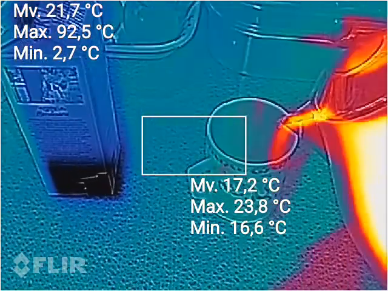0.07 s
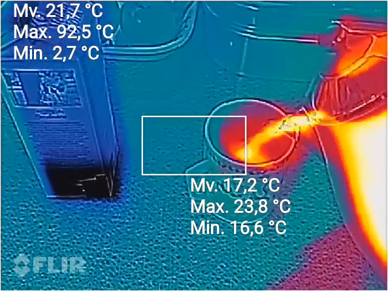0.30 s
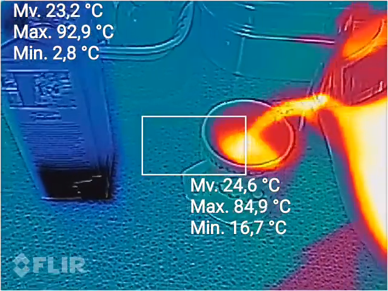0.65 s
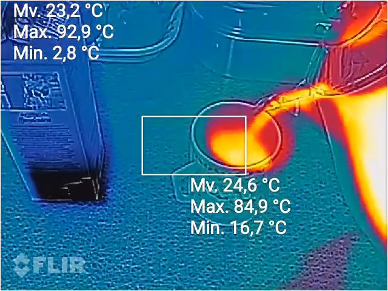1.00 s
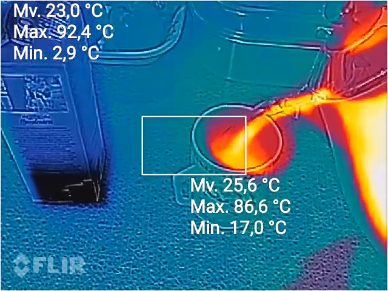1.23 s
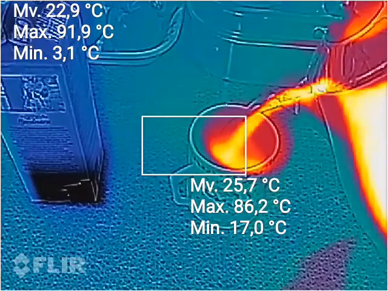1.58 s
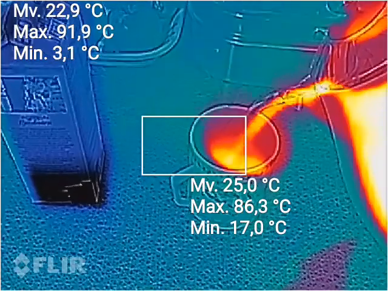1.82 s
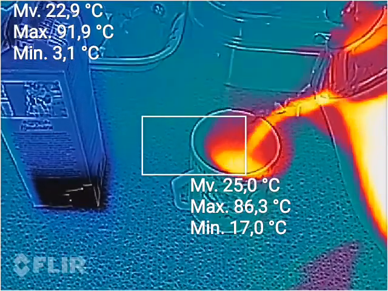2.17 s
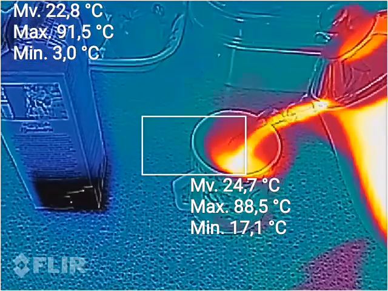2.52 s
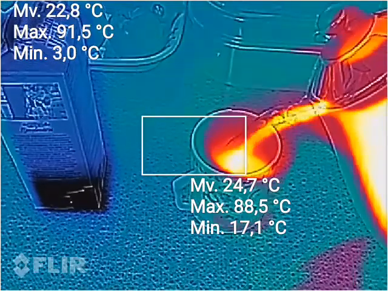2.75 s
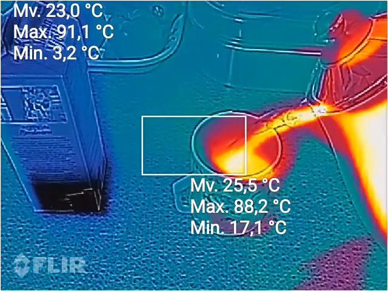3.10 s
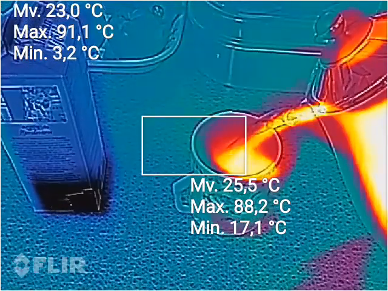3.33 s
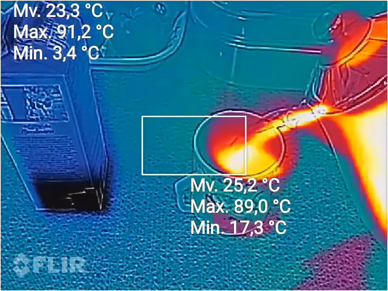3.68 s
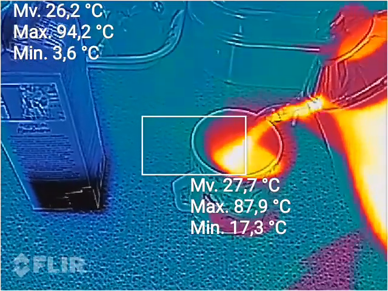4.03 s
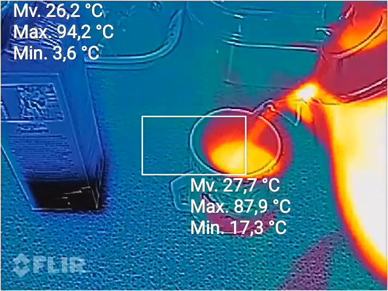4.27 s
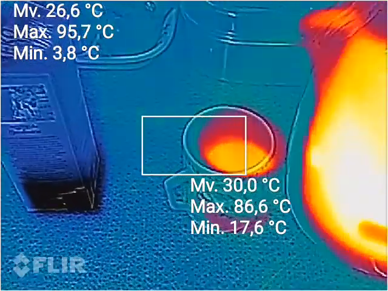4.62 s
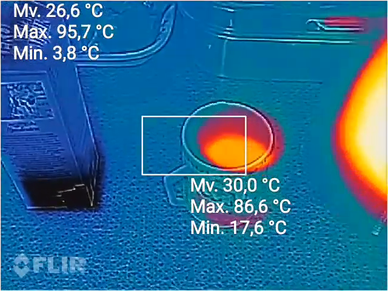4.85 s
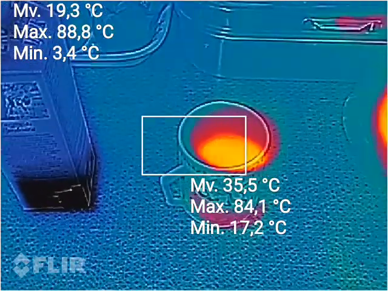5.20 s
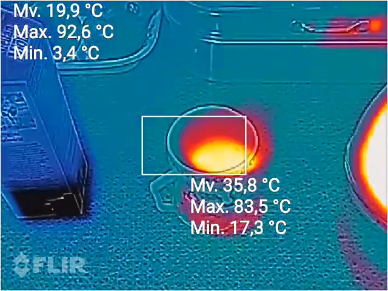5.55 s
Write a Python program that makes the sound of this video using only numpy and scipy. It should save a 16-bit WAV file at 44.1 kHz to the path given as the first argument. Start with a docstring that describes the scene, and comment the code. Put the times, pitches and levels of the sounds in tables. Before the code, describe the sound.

Hot water runs from a kettle into a mug close to the microphone. It starts with a bright, fizzy spatter, then turns to rounder gurgling as the mug fills. After about four seconds the pour ends in a few small glugs and a faint swish inside the kettle. The kettle is then set down with a sudden loud thump and clack, and nudged into place. The kitchen is otherwise quiet, with a short echo.

```python
"""Hot water runs from a kettle into a mug on a kitchen counter, over faint hiss and rumble.
First the stream spatters on the bottom; as the pool deepens it drags ever larger bubbles under,
which ring in the mug. Just after 4 s it ends in a few drops, the spout glugs and the water
swishes in the kettle. At 5.2 s the kettle is set down hard, booming the counter and clacking
into the room; it rocks onto its base and is nudged into place."""
import sys
import numpy as np
from scipy import signal
from scipy.fft import rfft, irfft, next_fast_len
from scipy.io import wavfile
from scipy.ndimage import uniform_filter1d, map_coordinates

SR = 44100
rng = np.random.default_rng(int(sys.argv[2]) if len(sys.argv) > 2 else 0)


def log_audio(samples):
    """Write samples as a 16-bit WAV file to the path given in sys.argv[1]."""
    # one column per channel
    frames = np.atleast_2d(samples).T
    # limit to full scale, then quantise
    limited = np.clip(frames, -1, 1)
    pcm = np.round(limited * 32767).astype(np.int16)
    wavfile.write(sys.argv[1], SR, pcm)


N = 249106
TIME = np.arange(N) / SR
POUR_START_S, POUR_END_S = 0.052, 4.268
BURSTS_PER_S = 20   # pace of the ragged swings in fizz, spray and the mug's ring


def from_db(db):
    """Decibels to gain."""
    return 10 ** (np.asarray(db) / 20)


def rms_one(x):
    """Scale to rms 1."""
    return x / np.sqrt(np.mean(x ** 2) + 1e-20)


def peak_at(db, x):
    """Scale to a peak level."""
    return from_db(db) * x / np.abs(x).max()


def steadied(x):
    """Ride the running level to about 1 while the grains keep their contrast."""
    power = uniform_filter1d(uniform_filter1d(x ** 2, 6000), 3000)
    return x / np.sqrt(np.maximum(power, 0) + np.mean(x ** 2) / 100)


def automation(points):
    """One value per sample from (seconds, value) breakpoints."""
    return np.interp(TIME, *np.transpose(points))


def ramp(centre_s, length_s):
    """A straight rise from 0 to 1 around a moment."""
    return np.clip((TIME - centre_s) / length_s + .5, 0, 1)


def fade(t60, size):
    """Exponential decay from 1, down 60 dB after t60 seconds."""
    return np.exp(-np.log(1000) * TIME[:size] / t60)


def drift(per_s):
    """A smooth wander through per_s random values a second; rms 1."""
    knots = rng.standard_normal(1000)
    return rms_one(map_coordinates(knots, [TIME * per_s], order=3, mode="wrap"))


def add(out, s, sound):
    """Mix a sound in at s seconds."""
    i = int(np.clip(round(s * SR), 0, N - 1))
    out[i:i + len(sound)] += sound[:N - i]


def cut(x, hz, kind, order=2):
    """Butterworth low- or high-pass."""
    return signal.sosfilt(signal.butter(order, min(hz, .45 * SR), kind, fs=SR, output="sos"), x + 1e-18)


def resonate(x, modes):
    """Parallel resonances, each with its own width and gain."""
    out = 0
    for hz, width_hz, db in modes:
        r = np.exp(-np.pi * width_hz / SR)
        poles = [1, -2 * r * np.cos(2 * np.pi * hz / SR), r * r]
        zeros = [(1 - r * r) / 2, 0, -(1 - r * r) / 2]
        out = out + from_db(db) * signal.lfilter(zeros, poles, x + 1e-18)
    return out


def noise(colour, size=N):
    """Noise shaped by (Hz, dB) points, falling steeply past both ends; rms 1."""
    padded = next_fast_len(size)
    hz = np.maximum(np.fft.rfftfreq(padded, 1 / SR), 1)
    points_hz, points_db = np.transpose(colour)
    eq = from_db(np.interp(np.log(hz), np.log(points_hz), points_db))
    skirts = 1 / np.sqrt((1 + (points_hz[0] / hz) ** 6) * (1 + (hz / points_hz[-1]) ** 6))
    white = rfft(rng.standard_normal(padded))
    return rms_one(irfft(white * eq * skirts, padded)[:size])


def patter(colour, per_s, spread_db, decay_s):
    """Tiny impacts of random strength, each a very short burst of noise."""
    hits = (rng.random(N) < per_s / SR) * from_db(spread_db * np.minimum(rng.exponential(1, N), 4))
    power = signal.fftconvolve(hits ** 2, fade(decay_s, size=600))[:N]
    return np.sqrt(np.maximum(power, 0)) * noise(colour)


# The quiet room's hiss and its low rumble. Each row: frequency in Hz, relative level in dB.
HISS_COLOUR = [(200, -3), (500, -7.5), (1200, -10), (2500, -17.5), (8000, -19.5), (16000, -9)]
RUMBLE_COLOUR = [(15, -58), (25, -12), (54, 5), (103, -3), (134, 1.5), (165, 0), (200, -5), (400, -11),
                 (520, -16), (880, -58)]
# The fader ride on the rumble. Each row: time in seconds, level in dB.
RUMBLE_RIDE = [(.05, -68), (.35, -71.5), (.5, -73.5), (2.5, -73), (2.8, -71), (4.1, -72.5), (4.5, -70),
               (4.62, -73), (4.7, -80), (5.12, -78.5)]


def room_tone():
    """Faint hiss, and a rumble that swells as the kettle is swung and sinks after the pour."""
    hiss = from_db(-82.5) * noise(HISS_COLOUR)
    rumble = from_db(automation(RUMBLE_RIDE)) * noise(RUMBLE_COLOUR)
    return hiss + rumble


# The length of the kitchen's tail. Each row: frequency in Hz, t60 in seconds.
REVERB_DECAY = [(150, .32), (500, .37), (2000, .37), (5000, .35), (9000, .29), (15000, .22)]
# The tone of that tail. Each row: frequency in Hz, relative level in dB.
REVERB_COLOUR = [(120, 25.5), (260, 9), (400, 4.5), (620, 3), (1500, -3), (4500, 0), (8000, -2), (15000, 4)]


def kitchen_reverb(x, first_echo_s=0.0034, size=26000):
    """Diffuse reflections build up after the first echo and die sooner in the treble."""
    wash = rfft(noise(REVERB_COLOUR, size))
    log_hz = np.log(np.maximum(np.fft.rfftfreq(size, 1 / SR), 1))
    centres_hz, t60s = np.transpose(REVERB_DECAY)
    tail = np.zeros(size)
    for share, t60 in zip(np.eye(len(t60s)), t60s):
        band = np.interp(log_hz, np.log(centres_hz), share)
        tail += irfft(wash * band, size) * fade(t60, size)
    tail *= np.clip(TIME[:size] / first_echo_s - 1, 0, 1)
    return signal.fftconvolve(x, tail / np.sqrt(np.sum(tail ** 2)))[:N]


# Early reflections. Each row: delay in seconds, level in dB against the direct sound.
EARLY_ECHOES = [(.007, -14.5), (0.0153, -17)]


def near_walls(x):
    """The sound plus its first bounces off the back wall and cupboards."""
    out = x.copy()
    for delay_s, db in EARLY_ECHOES:
        add(out, delay_s, from_db(db) * x)
    return out


def slapback(x, delay_s=0.0065):
    """The sound plus its treble coming straight back off the wall."""
    out = x.copy()
    add(out, delay_s, from_db(-1.5) * cut(x, 8800, "high"))
    return out


# Water sloshing inside the kettle. Each row: frequency in Hz, relative level in dB.
SWISH_COLOUR = [(120, -34), (200, -31), (512, -7), (1150, -16), (1260, -8), (1460, -22), (1540, -16),
                (2550, -12.5), (3410, -21.5), (15000, -20.5)]


def kettle_swish(start_s=4.425, attack_s=0.025, hold_s=0.035, t60=0.53):
    """The kettle is tipped upright; its water swishes and settles."""
    attack = np.clip((TIME - start_s) / attack_s, 0, 1)
    settling_s = np.maximum(TIME - start_s - attack_s - hold_s, 0)
    return attack * from_db(-69 - 60 * settling_s / t60) * noise(SWISH_COLOUR)


# The hard tone of kettle on base, for scuff and clacks. Each row: frequency in Hz, relative level in dB.
CONTACT_COLOUR = [(250, -14), (360, 0.5), (464, -7.5), (700, -13), (963, -8.5), (1240, -10.5),
                  (2060, -11.5), (2270, -18.5), (2700, -13.5), (3150, -18), (4500, -13.5), (6000, -14),
                  (7120, -24.5), (9630, -18), (12600, -19.5), (16000, -27)]


def kettle_scuff():
    """The kettle's foot rubs over the base with a faint gritty rustle."""
    grit = rms_one(patter(CONTACT_COLOUR, per_s=580, spread_db=3.5, decay_s=0.016))
    return from_db(-68) * ramp(centre_s=5.51, length_s=0.03) * grit


def struck(modes, size):
    """A knocked object: each mode takes about a cycle to build up, then rings out."""
    return sum(from_db(db) * np.sin(2 * np.pi * hz * TIME[:size])
               * fade(t60, size) * (1 - fade(4 / hz, size)) for hz, db, t60 in modes)


# The boom of the flexing counter top and the ring of the kettle's body.
# Each row: frequency in Hz, relative level in dB, t60 in seconds.
COUNTER_MODES = [(64, -15, .42), (89, -2, .3), (102, 1, .26), (115, -5, .264), (138, -10, .42),
                 (187, -21, .42), (216, -16, .42)]
KETTLE_MODES = [(333, -16, 0.23), (391, -15.5, .34), (444, -4, 0.071), (447, -25, 0.19), (548, -22.5, .36),
                (636, -32, 0.42), (915, -20, 0.23), (977, -6.5, 0.067), (1180, -34, .15), (1500, -16, 0.13),
                (2104, -27.5, 0.19), (2745, -19.5, 0.1), (3950, -14, 0.066), (6240, -16, 0.059)]
# The kettle lands, rocks and is nudged home. Each row: start in seconds, thump gain in dB,
# clack gain in dB, brightness as a low-pass cutoff in Hz, clack t60 in seconds.
KETTLE_KNOCKS = [(5.1841, -11, -16.5, 11100, 0.06), (5.26, -12.5, -14.5, 10200, 0.041),
                 (5.2856, -20.5, -23, 13800, 0.024), (5.517, -39.5, -50.5, 1200, 0.19),
                 (5.609, -38, -45, 1840, 0.11), (5.639, -30, -40.5, 2370, 0.033)]


def kettle_down(size=SR // 2):
    """Each contact thumps the counter, rings the kettle and sets off a short, noisy clack."""
    thumps, rings, clacks = np.zeros((3, N))
    counter, body = struck(COUNTER_MODES, size), struck(KETTLE_MODES, size)
    attack = 1 - fade(0.005, size)
    crack = from_db(-3.5) * fade(0.027, size)   # the sharp front of each clack
    for s, thump_db, clack_db, bright_hz, clack_t60 in KETTLE_KNOCKS:
        clack = noise(CONTACT_COLOUR, size) * attack * (crack + fade(clack_t60, size))
        add(thumps, s, from_db(thump_db) * counter)
        add(rings, s, from_db(thump_db - 2) * cut(body, bright_hz, "low", order=1))
        add(clacks, s, from_db(clack_db) * cut(clack, bright_hz, "low"))
    return thumps, rings, clacks


# The mug's air column and wall. Each row: frequency in Hz, width in Hz, gain in dB.
MUG_MODES = [(372.7, 30.4, 10.5), (504, 32, 7), (593.4, 69, 4.5), (861, 115, 3), (985, 43, 1),
             (1596, 38, 4.5), (1900, 24, 1), (2390, 18, 4), (2998, 28, 4), (3150, 29, 8.5), (3820, 29, 1),
             (5420, 240, 0)]


def mug(x):
    """The mug's resonances ring on top of the direct sound."""
    return x + resonate(x, MUG_MODES)


def fill(s):
    """How full the mug is at s seconds, 0 to 1."""
    return np.clip((s - POUR_START_S) / (POUR_END_S - POUR_START_S), 0, 1)


def shallow():
    """1 while the jet still hits the bottom, 0 once the pool is deep enough to swallow air."""
    return 1 - ramp(centre_s=1.675, length_s=0.47)


# The hollow notes of the air in the mug. Each row: frequency in Hz, width in Hz, gain in dB.
AIR_MODES = [(570, 47, -12), (853, 117, 1), (953, 39, 4.5)]


def hollow_air(impacts, flow_db):
    """The jet's impacts keep the air in the mug sounding, more softly over a shallow pool."""
    return from_db(-67 + flow_db - 4.5 * shallow()) * steadied(resonate(impacts, AIR_MODES))


# The bright ring of the mug's wall. Each row: frequency in Hz, width in Hz, gain in dB.
WALL_MODES = [(3080, 42, -3), (3202, 43, 5), (5280, 220, -15)]


def wall_ring(impacts, flow_db):
    """The wall rings for as long as the jet strikes; rising water cushions it."""
    jet_on = ramp(centre_s=0.16, length_s=0.02) - ramp(centre_s=4.18, length_s=0.045)
    level_db = -71 + 0.6 * flow_db - 4 * fill(TIME) - 4 * shallow() + 3 * drift(BURSTS_PER_S)
    return jet_on * from_db(level_db) * steadied(resonate(impacts, WALL_MODES))


# Churning foam. Each row: frequency in Hz, relative level in dB.
FOAM_COLOUR = [(340, -1.5), (480, -15.5), (700, -0.5), (950, -15), (1250, 8.5), (1700, -6.5), (2200, -4)]


def foam_churn(flow_db):
    """The foam churns louder as the mug fills."""
    churn = mug(patter(FOAM_COLOUR, per_s=400, spread_db=7, decay_s=0.043))
    return from_db(-60.5 + flow_db - 27.5 * (1 - fill(TIME))) * steadied(churn)


# The sizzle of flying droplets. Each row: frequency in Hz, relative level in dB.
SPRAY_COLOUR = [(2000, -11.5), (4500, -3), (5700, -2.5), (6500, -7), (7400, -0.5), (8500, 4.5), (10000, 2),
                (12500, 0), (15500, -4.5)]


def spray(flow_db):
    """Fine spray crackles in ragged bursts, softer as the rising water cushions the jet."""
    level_db = -69 + 0.2 * flow_db - 7.5 * fill(TIME) + 3.5 * drift(BURSTS_PER_S)
    return from_db(level_db) * steadied(patter(SPRAY_COLOUR, per_s=8400, spread_db=6, decay_s=0.0075))


def bubble(hz, cycles, rise, size=3000):
    """A pinched-off bubble swells and rings out; nearing the surface, its pitch climbs by a share."""
    t60 = cycles / hz
    pitch = hz * (1 + rise * np.minimum(TIME[:size] / t60, 1))
    envelope = fade(t60, size) * (1 - fade(8 / hz, size))
    return peak_at(0, np.sin(2 * np.pi * np.cumsum(pitch) / SR) * envelope)


def swarm(centre_hz, octaves, cycles, rise, spread_db, count):
    """Bubbles of random size are born at random moments around a moving pitch and ring in the mug."""
    out, scatter = np.zeros(N), octaves * np.ones(N)
    for when, up, down, softness in rng.random((count, 4)):
        i = int(when * N)
        hz = centre_hz[i] * 2 ** (scatter[i] * (up - down))
        add(out, i / SR, from_db(-spread_db * np.sqrt(softness)) * bubble(hz, cycles, rise, size=1500))
    return steadied(mug(out))


# Drops pattering on the water. Each row: frequency in Hz, relative level in dB.
SPLATTER_COLOUR = [(600, 3.5), (900, 4.5), (1400, 12.5), (2000, -21), (2700, -15), (4200, 1), (5600, 9),
                   (6500, -36)]


def fizz_and_splatter(flow_db):
    """Tiny bubbles fizz and drops patter; both sink away as the rising water cushions the jet."""
    level_db = -61 + 0.84 * flow_db - 17 * fill(TIME) + 1.5 * drift(BURSTS_PER_S)
    clump_hz = 3000 * 2 ** (0.15 * drift(40))   # each clump of bubbles has a size of its own
    fizz = swarm(clump_hz, octaves=0.85, cycles=55, rise=0.4, spread_db=21, count=4000)
    splatter = steadied(mug(patter(SPLATTER_COLOUR, per_s=1800, spread_db=4, decay_s=0.017)))
    return from_db(level_db) * (from_db(-2.5) * fizz + from_db(-7) * splatter)


def middle_bubbles(flow_db):
    """Mid-sized bubbles climb with the shortening air column and scatter wider as the mug fills."""
    hz = np.interp(fill(TIME) ** 1.87, [0, 1], [870, 1550])
    octaves = np.interp(fill(TIME) ** 2, [0, 1], [0.31, 0.52])
    bubbles = swarm(hz, octaves, cycles=23, rise=0.011, spread_db=29, count=4000)
    return from_db(-65 + flow_db - 5 * shallow()) * bubbles


def large_bubbles(flow_db):
    """Big bubbles need a pool; deeper water holds larger, lower ones."""
    hz = np.interp(fill(TIME), [0, 1], [682, 455])
    bubbles = swarm(hz, octaves=0.52, cycles=5.7, rise=0.057, spread_db=14.5, count=1000)
    return from_db(-63 + flow_db - 23 * shallow()) * cut(bubbles, 220, "high", order=1)


def plop(peak_db, hz, cycles, rise):
    """One bubble heard through the mug."""
    return peak_at(peak_db, mug(bubble(hz, cycles, rise)))


def slap(peak_db, hz, t60, size=2400):
    """A short wet slap inside the mug: noise centred on a pitch."""
    colour = [(hz / 3, -14), (hz / 1.46, -6), (hz, 0), (hz * 1.63, -7), (hz * 2.1, -17)]
    return peak_at(peak_db, mug(noise(colour, size) * fade(t60, size)))


# Low glugs as the pour stops. Each row: start in seconds, peak level in dB, starting pitch in Hz.
SPOUT_GLUGS = [(4.243, -55.5, 436), (4.258, -52.5, 337), (4.276, -56, 378), (4.292, -61, 338),
               (4.324, -65, 394), (4.361, -66, 373)]


def spout_glugs():
    """Water falls back into the spout with a few rising bubble notes."""
    out = np.zeros(N)
    for s, peak_db, hz in SPOUT_GLUGS:
        add(out, s, from_db(peak_db) * bubble(hz, cycles=17.4, rise=0.26))
    return out


# Sharp ticks on top of the spray. Each row: start in seconds, peak level in dB.
SPIT_HITS = [(0.263, -53), (0.311, -50.5), (0.5205, -46.5), (0.575, -48), (0.6485, -40.5), (0.829, -48),
             (1.282, -43.5), (1.3985, -46.5), (1.6155, -45.5), (1.7367, -38.5), (1.8417, -48),
             (1.8816, -48.5), (1.911, -50), (2.081, -53), (2.333, -50.5), (2.4197, -53), (2.621, -66),
             (2.8394, -45), (2.9114, -49.5), (2.9676, -39), (3.203, -60.5), (3.424, -54), (3.907, -53.5),
             (4.051, -54)]


def spits(size=4000):
    """Single droplets and bursting films snap and ring the mug's wall."""
    out = np.zeros(N)
    burst = fade(0.038, size) + 0.31 * fade(0.31, size)   # the snap, then scattered droplets
    for s, peak_db in SPIT_HITS:
        spit = noise(SPRAY_COLOUR, size) * burst
        add(out, s, peak_at(peak_db, spit + from_db(6) * resonate(spit, WALL_MODES)))
    return out


# Bright bubble accents. Each row: start in seconds, base level in dB, base pitch in Hz.
PLINK_HITS = [(0.1558, -53.5, 2970), (0.178, -51.5, 3870), (0.2032, -49, 4110), (0.3154, -51, 4100),
              (0.396, -57, 3070), (0.426, -52, 3300), (0.465, -56.5, 2550), (0.4868, -55, 2430),
              (0.5324, -46, 2820), (0.578, -51, 1795), (0.6488, -47.5, 2840), (0.723, -55.5, 2220),
              (0.772, -59, 2460), (0.844, -56, 3720), (0.884, -53, 3600), (0.912, -49, 3075),
              (0.949, -60, 2730), (0.982, -65, 2000), (1.028, -52, 2320), (1.063, -56, 2500),
              (1.081, -55.5, 1860), (1.132, -57, 2380), (1.173, -58, 1970), (1.197, -53, 3940),
              (1.224, -59, 2000), (1.3728, -41.5, 3980), (1.3979, -46, 2890), (1.451, -49.5, 2370),
              (1.479, -57, 3690), (1.505, -50, 3740), (1.52, -48.5, 4100), (1.54, -48, 3230),
              (1.556, -50, 5450), (1.863, -48.5, 4990), (1.911, -52, 3160), (2.032, -56.5, 2770),
              (2.149, -47.5, 5100), (2.184, -55.5, 1896), (2.225, -56.5, 2420), (2.5321, -42, 3280),
              (2.909, -48.5, 3080), (3.034, -56, 1900), (3.183, -52, 1860), (3.903, -54.5, 1930)]


def plinks():
    """Small bubbles ring with a rising chirp over a bright slap."""
    out = np.zeros(N)
    for s, db, hz in PLINK_HITS:
        add(out, s, plop(db - 2.5, hz * 0.89, cycles=110, rise=0.55))
        add(out, s, slap(db - 3.5, hz, t60=0.1))
    return out


# Low, round bubble accents. Each row: start in seconds, peak level in dB, base pitch in Hz.
DEEP_PLOPS = [(1.425, -54, 600), (1.611, -47.5, 580), (1.657, -50, 620), (1.742, -53, 635),
              (1.918, -45.5, 562), (1.945, -49.5, 570), (2.084, -48.5, 570), (2.129, -45, 590),
              (2.187, -53, 590), (2.221, -51, 555), (2.258, -52, 597), (2.354, -49.5, 557),
              (2.619, -50.5, 555), (2.731, -52.5, 463), (2.845, -43, 530), (2.917, -49.5, 590),
              (2.955, -62, 507), (3.067, -51, 500), (3.251, -47.5, 487), (3.392, -51.5, 614),
              (3.511, -50.5, 454), (3.713, -52, 420), (3.758, -65, 484), (3.878, -58, 378),
              (4.015, -50.5, 490), (4.064, -51.5, 506), (4.11, -52.5, 500)]


def deep_plops():
    """The largest bubbles are dragged deep under the surface and ring briefly."""
    out = np.zeros(N)
    for s, peak_db, hz in DEEP_PLOPS:
        add(out, s, plop(peak_db, hz * 0.967, cycles=9.6, rise=0.061))
    return out


# The loudest gulps of air. Each row: start in seconds, base level in dB, base pitch in Hz.
AIR_GULPS = [(0.524, -54, 977), (0.58, -53, 885), (0.805, -46.5, 952), (0.84, -45, 887),
             (1.323, -48.5, 944), (1.403, -43.5, 880), (1.423, -37.5, 1013), (1.43, -40.5, 933),
             (1.541, -42.5, 1000), (1.575, -41, 883), (1.61, -40, 908), (1.656, -40, 944),
             (1.736, -42, 1000), (1.774, -48, 993), (1.882, -46, 928), (1.911, -38, 952),
             (1.961, -46.5, 940), (2.034, -46.5, 1000), (2.079, -45.5, 945), (2.123, -45.5, 990),
             (2.185, -46.5, 944), (2.221, -48.5, 937), (2.273, -43.5, 1016), (2.469, -48.5, 1010),
             (2.659, -45, 1004), (2.724, -49.5, 1060), (2.84, -41.5, 1010), (2.954, -46.5, 1134),
             (3.026, -48, 1310), (3.185, -52, 1210), (3.244, -46, 1010), (3.273, -45, 800),
             (3.33, -45.5, 1450), (3.39, -48, 1210), (3.424, -48.5, 1480), (3.57, -53.5, 1600),
             (3.709, -52, 1040), (3.756, -49, 1010), (3.869, -54, 1290), (3.936, -55, 1620),
             (4.009, -57, 965), (4.06, -56, 920), (4.105, -41.5, 1130), (4.149, -45, 1470)]


def gulps():
    """An air pocket slaps shut, then rings; growing foam means more slap and a shorter ring."""
    out = np.zeros(N)
    for s, db, hz in AIR_GULPS:
        foam = fill(s) ** 3
        slap_db = db + np.interp(foam, [0, 1], [-10, -3.5])
        cycles = np.interp(foam, [0, 1], [36, 16])
        add(out, s, slap(slap_db, hz * 1.12, t60=0.036))
        add(out, s, plop(db - 1.8, hz * 0.98, cycles, rise=0.14))
    return out


def surge(pocket_s=0.017, rush_s=0.012, hush_db=-3.5, rush_db=4):
    """A gain that hushes the churning while each air pocket forms and lifts it on the collapse."""
    offsets_s = [-pocket_s, -pocket_s / 2, 0, rush_s / 4, rush_s, 2 * rush_s]
    shape_db = [0, hush_db, hush_db, rush_db, rush_db, 0]
    return from_db(sum(np.interp(TIME - s, offsets_s, shape_db) for s, _, _ in AIR_GULPS))


# The strength of the stream as the kettle is tilted. Each row: time in seconds, relative level in dB.
FLOW_RIDE = [(.17, -23), (.32, -7), (.55, 0), (.7, -8.5), (.85, 3.5), (1.0, -10), (1.17, -3), (1.35, 5.5),
             (1.55, 7.5), (1.68, -3.5), (2.2, 1), (2.45, -4), (2.76, -1.5), (2.82, -3), (2.92, 1.5),
             (3.3, 1), (3.62, -5.5), (3.9, -5.5), (3.98, -11), (4.02, -7), (4.15, -6), (4.22, -14.5)]


def stream(trickle_s=0.23):
    """The jet churns up bubbles and foam, sounds the mug and throws spray, then trickles out."""
    flow_db, pulsing = automation(FLOW_RIDE), surge()
    bubbles = large_bubbles(flow_db) + middle_bubbles(flow_db)
    sparkle = np.sqrt(pulsing) * fizz_and_splatter(flow_db) + spray(flow_db)
    lumps = from_db(1.73 * drift(29.99))   # the jet breaks into lumps as it falls
    impacts = patter([(450, 0), (6000, 0)], per_s=1500, spread_db=18, decay_s=0.0058)
    body = bubbles + hollow_air(impacts, flow_db) + foam_churn(flow_db) + wall_ring(impacts, flow_db)
    flowing = automation([(POUR_END_S, 1), (POUR_END_S + trickle_s, 0)])
    return flowing * lumps * (pulsing * body + sparkle)


def scene():
    """The mug is close to the microphone; the kettle's clack fills the room."""
    water = stream() + gulps() + deep_plops() + plinks() + spits() + spout_glugs()
    thumps, rings, clacks = kettle_down()
    contacts = clacks + kettle_scuff()
    close = near_walls(water) + slapback(contacts) + thumps + rings
    reverb_send = from_db(-8.5) * water + from_db(-2.5) * contacts + from_db(-15.5) * rings
    return (close + kitchen_reverb(reverb_send) + room_tone() + kettle_swish())[None]


def record(dry):
    """A small microphone loses the deepest bass; the top is cut steeply."""
    thinned = cut(dry, 42, "high", order=3)
    return signal.sosfilt(signal.ellip(10, .1, 80, 15900, fs=SR, output="sos"), thinned)


dry = scene()
out = record(dry)
log_audio(out)
```